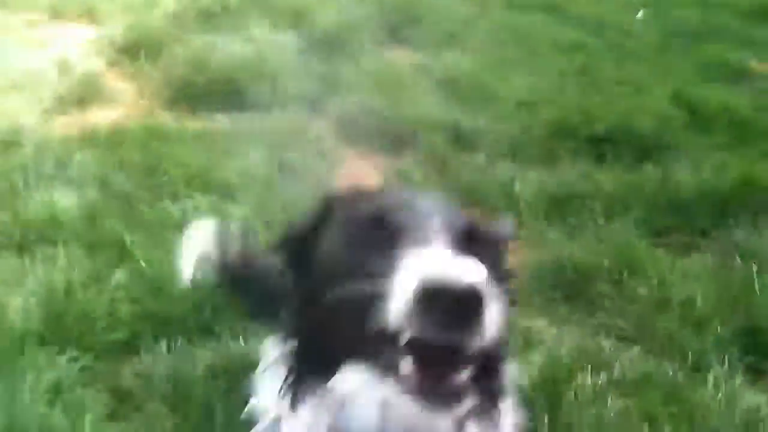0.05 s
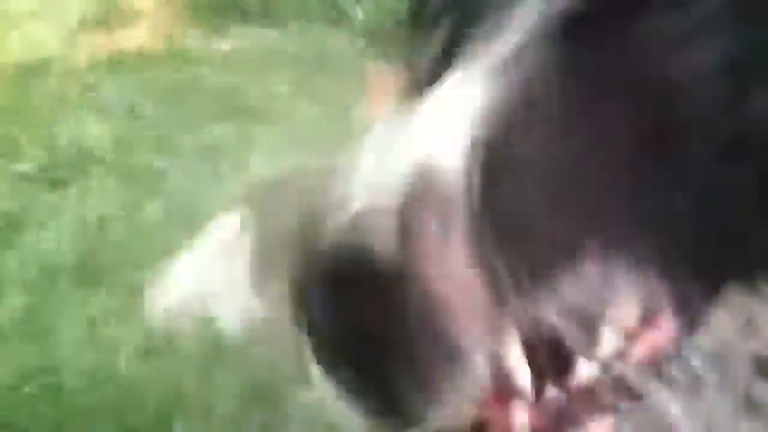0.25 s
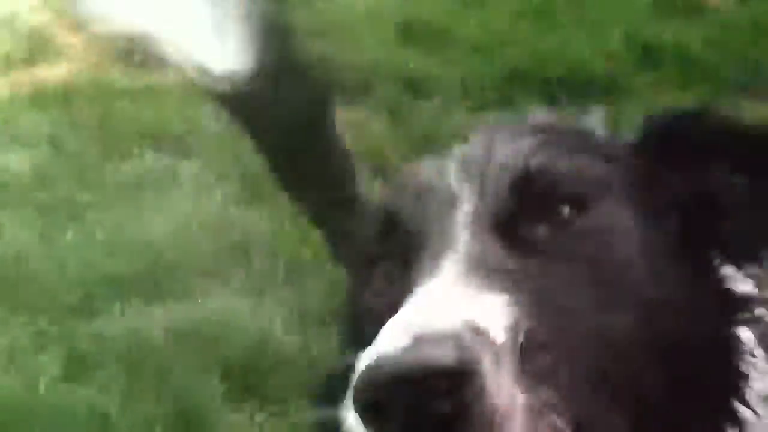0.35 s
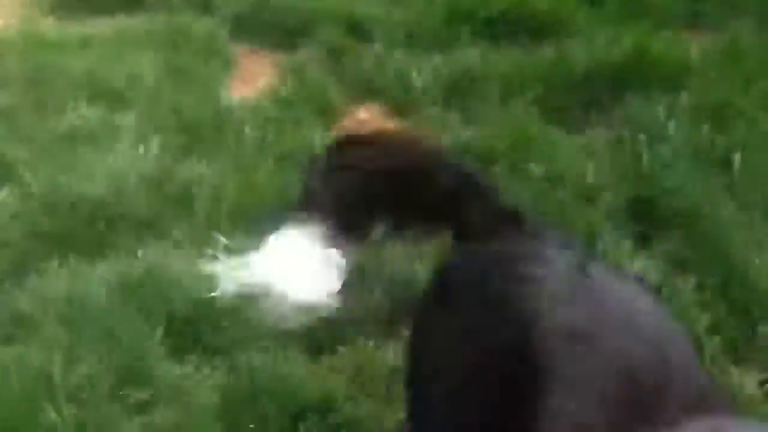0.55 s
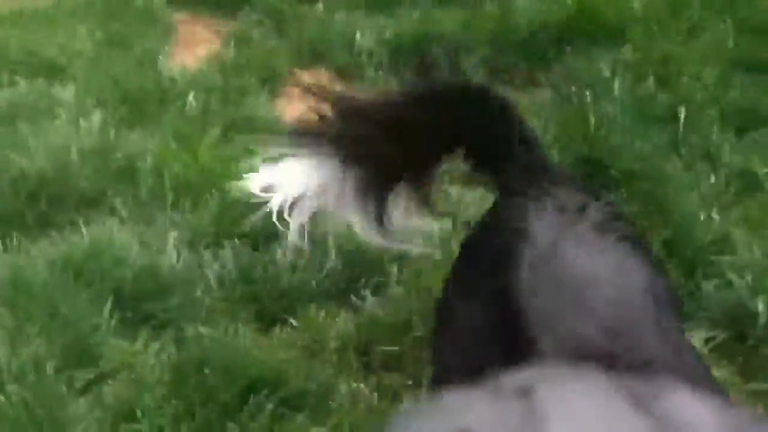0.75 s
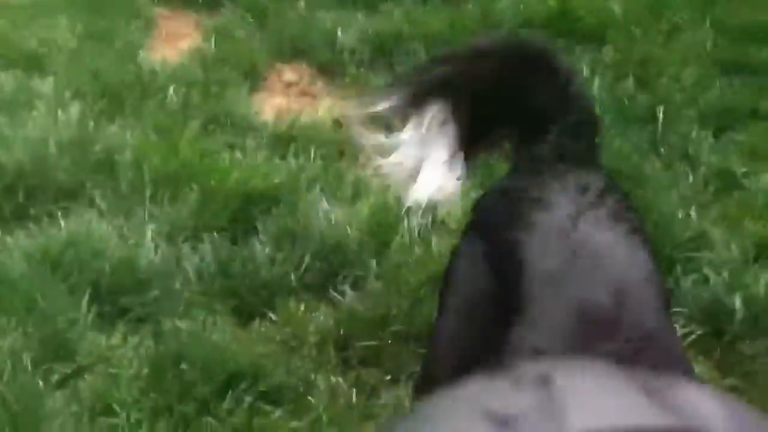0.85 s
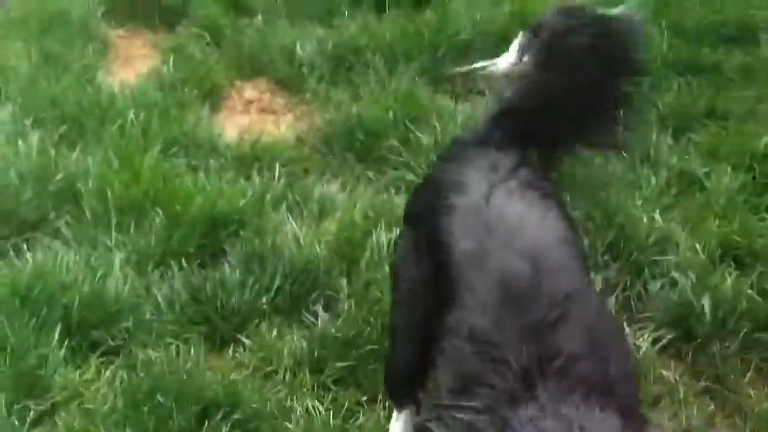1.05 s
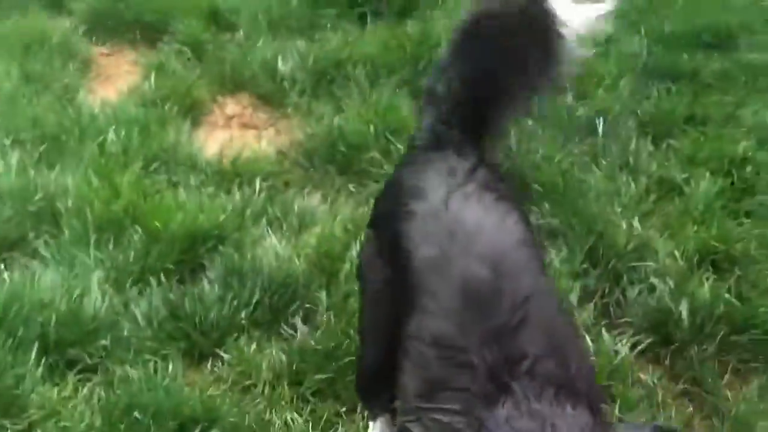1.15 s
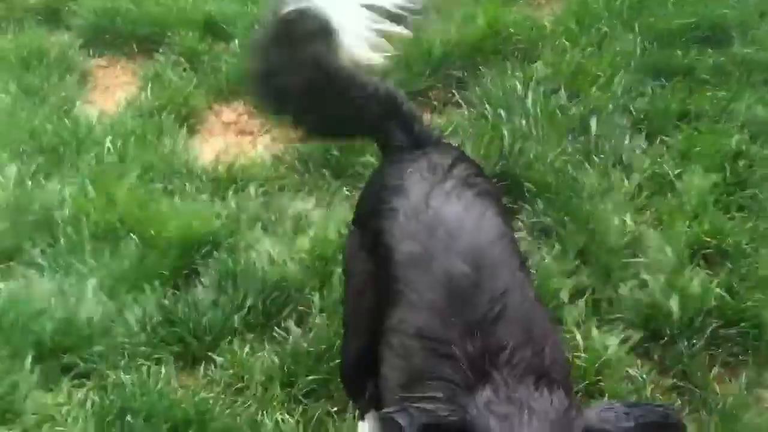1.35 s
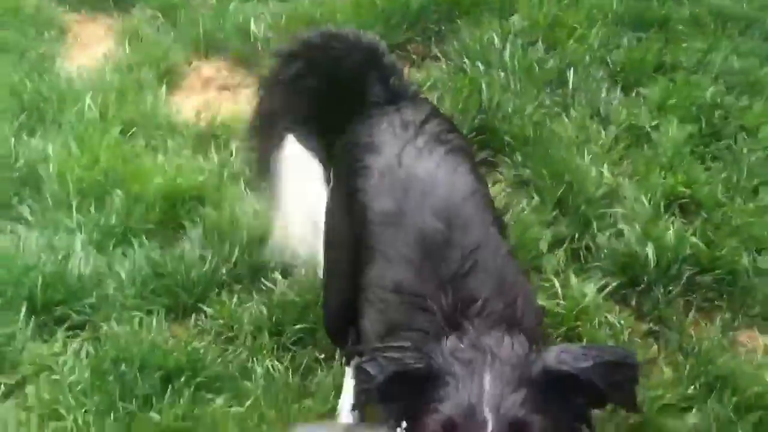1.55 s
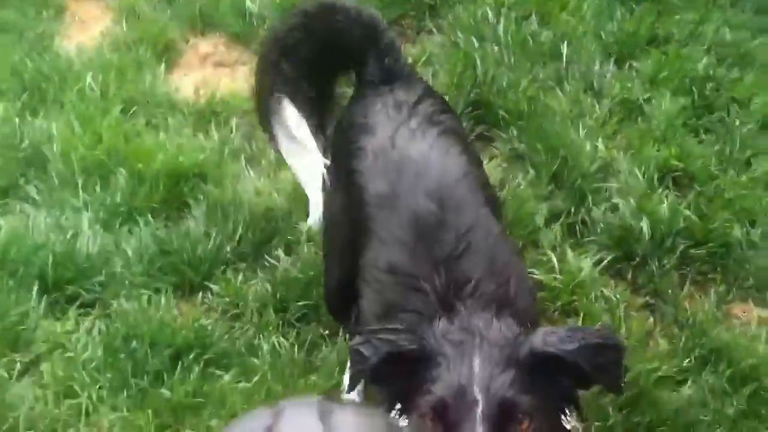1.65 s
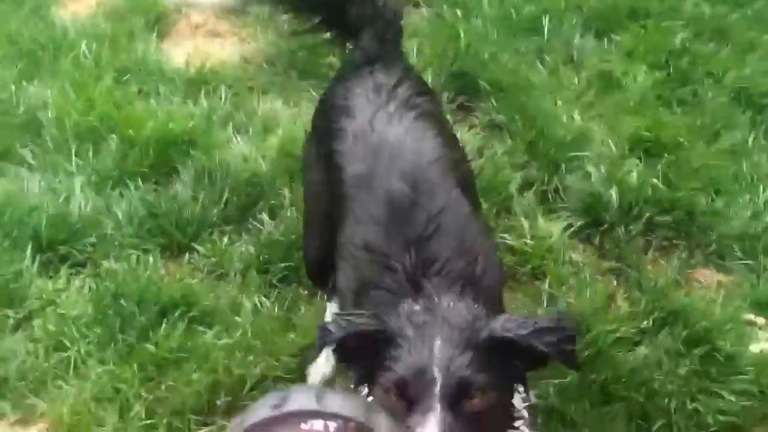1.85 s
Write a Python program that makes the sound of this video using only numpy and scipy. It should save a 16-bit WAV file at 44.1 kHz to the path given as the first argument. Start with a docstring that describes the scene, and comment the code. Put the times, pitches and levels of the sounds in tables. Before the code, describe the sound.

Hose water slaps a dog's muzzle close by, swelling at 0.2 seconds into a bright spatter that rings hollow in its mouth and stops with a knock near 0.35. Two dull knocks and quick ticks follow around 0.5 to 0.6, with collar tags jingling lightly from 0.4 to 0.9. Soft paw steps in wet grass and stray drips fade by 1.7 seconds, over a faint distant motor hum.

```python
"""Water spatters on a dog's muzzle and rings in its open mouth as it bites at a garden hose jet, close by.
The spray is thousands of tiny impacts, with sharp slaps, pops of trapped air and stray drips.
Dull knocks, a quick run of ticks, jingling metal collar tags and paws in wet grass follow the bite.
The yard gives a faint echo, and a distant motor hums under the outdoor air."""
import sys
import numpy as np
from scipy import signal
from scipy.fft import rfft, irfft, next_fast_len
from scipy.io import wavfile
from scipy.ndimage import uniform_filter1d, map_coordinates

SR = 44100
rng = np.random.default_rng(int(sys.argv[2]) if len(sys.argv) > 2 else 0)


def waveform_to_disk(signal):
    """Save audio, clipped to [-1, 1], as 16-bit WAV at the path in sys.argv[1]."""
    frames = np.transpose(np.atleast_2d(signal))
    scaled = np.clip(frames, -1, 1) * 32767
    samples = np.round(scaled).astype(np.int16)
    wavfile.write(sys.argv[1], SR, samples)


N = 83790


def amp(db):
    """Decibels to gain."""
    return 10 ** (np.asarray(db) / 20)


def unit(x):
    """Scale to rms 1."""
    return x / np.sqrt(np.mean(x ** 2) + 1e-20)


def fader(points):
    """Gain per sample from (t/s, level/dB) points."""
    return amp(np.interp(np.arange(N) / SR, *np.transpose(points)))


def filtered(x, response):
    """Filter x by a gain that is a function of frequency."""
    size = next_fast_len(N + SR // 2)
    return irfft(rfft(x, size) * response(np.fft.rfftfreq(size, 1 / SR)), size)[:N]


def coloured(x, eq):
    """Shape x by (f/Hz, level/dB) points, then scale to rms 1."""
    f, db = np.transpose(eq)
    return unit(filtered(x, lambda hz: amp(np.interp(np.log(hz + 1), np.log(f + 1), db))))


def wobble(per_s):
    """A smooth curve through per_s random values a second."""
    return map_coordinates(rng.standard_normal(256), [np.arange(N) * per_s / SR], mode="wrap")


def grains(per_s, spread_db, hiss_share):
    """Tiny random impacts of uneven size over a fine hiss, even in overall strength."""
    hits = (rng.random(N) < per_s / SR) * rng.choice([-1, 1], N)
    hits = hits * amp(spread_db * np.minimum(rng.exponential(size=N), 4))
    hits /= np.sqrt(np.abs(uniform_filter1d(hits ** 2, size=800)) + 1e-6)
    return np.sqrt(1 - hiss_share) * hits + np.sqrt(hiss_share) * rng.standard_normal(N)


def fade(t, t60):
    """Exponential decay, 60 dB down at t60."""
    return np.exp(-np.log(1000) * t / t60)


def add(track, s, sound):
    """Mix a sound in at s seconds."""
    part = track[max(round(s * SR), 0):][:len(sound)]
    part += sound[:len(part)]


# Fader ride of the spray on the muzzle: t/s, level/dB
SPRAY_RIDE = [(0, -36), (.008, -43), (.03, -51), (.056, -48), (.09, -61), (.165, -69), (.19, -48),
              (.205, -37), (.213, -24.5), (.256, -20.5), (.262, -29), (.274, -27), (.283, -21.5), (.3, -23),
              (.336, -23), (.347, -56), (.395, -57.5), (.6, -58), (.8, -64.5), (1.0, -70), (1.2, -78)]
# Bright, wet EQ of the spray: f/Hz, level/dB
SPRAY_EQ = [(59, -59.5), (100, -16), (254, -10.5), (288, -13.5), (413, -11.5), (469, -17.5), (568, -9),
            (673, -18.5), (732, -9.5), (1170, -8), (1270, -7), (1410, -23.5), (1640, 2.5), (1940, -17),
            (2300, 0.5), (3230, -10.5), (3820, -1.5), (5720, 1.5), (6350, 2), (7060, 2), (9300, -3),
            (10800, -2), (15800, -15.5)]
# Bigger slugs of water punch up the spray: t/s, boost/dB
SURGES = [(0.2153, 7), (0.2308, 2.5), (0.2469, 9), (.2552, 0.5), (0.2865, 5), (0.2946, 4.5), (0.3363, 7.5)]
# Fader ride of the water inside the mouth: t/s, level/dB
MOUTH_RIDE = [(0, -53.5), (.03, -63), (.048, -61), (.062, -70), (.19, -80), (.22, -32.5), (.27, -34.5),
              (.3, -31), (.315, -19.5), (.336, -26), (.347, -44.5), (.37, -52), (.4, -57), (.5, -79.5)]
# Hollow resonances of the open mouth: f/Hz, width/Hz, level/dB
MOUTH_MODES = [(1300, 76, 5), (1780, 80, -3), (2210, 280, -2.5), (2750, 350, 0), (3535, 660, -1.5),
               (4935, 450, -8.5)]

def jet():
    """Droplets spatter on the muzzle in surges; those that enter the mouth excite its resonances."""
    def mouth(f):
        return sum((-1) ** k * amp(db) * 1j * f * width / (hz * hz - f * f + 1j * f * width)
                   for k, (hz, width, db) in enumerate(MOUTH_MODES))

    t, surge_s = np.arange(N) / SR, .0014
    surge = amp(sum(db * np.exp(-((t - s) / surge_s) ** 2) for s, db in SURGES))
    spray = coloured(grains(per_s=7500, spread_db=2.6, hiss_share=.38), SPRAY_EQ)
    hollow = unit(filtered(rng.standard_normal(N), mouth))
    return surge * fader(SPRAY_RIDE) * spray + fader(MOUTH_RIDE) * hollow


# Sharp slaps of water ahead of the main burst: t/s, level/dB, t60/s
SLAPS = [(.110, -45, .018), (.175, -25.5, 0.037), (.2025, -40, 0.01584)]
# Slap EQ, a low-mid body and a bright edge: f/Hz, level/dB
SLAP_EQ = [(100, -33), (250, -8), (550, 3.5), (1100, -8), (1700, -12), (2400, -2), (4200, 1), (6300, 4.5),
           (8200, 3), (11500, -16), (15800, -32.5)]
# Stray droplets after the burst: t/s, level/dB
DRIPS = [(1.038, -52.5), (1.213, -58), (1.255, -57.5), (1.263, -62), (1.312, -57.5), (1.370, -49),
         (1.450, -58), (1.512, -59.5), (1.526, -59.5)]
# Thin, glassy drip EQ: f/Hz, level/dB
DRIP_EQ = [(1000, -37), (6000, -2.5), (11000, -2.5), (14500, .5)]

def splashes():
    """Single slugs and drops of water land with a click, then scatter."""
    def land(cues, eq, click_db):
        envelope, clicks, t = np.zeros(N), np.zeros(N), np.arange(SR // 5) / SR
        for s, db, t60 in cues:
            add(envelope, s, amp(db) * fade(t, t60))
            add(clicks, s, amp([db + click_db]))
        impacts = clicks + envelope * grains(per_s=6500, spread_db=1, hiss_share=.15)
        return np.std(impacts) * coloured(impacts, eq)

    drips = [(s, db, .01) for s, db in DRIPS]  # each with a t60 of 10 ms
    return land(SLAPS, SLAP_EQ, click_db=18.5) + land(drips, DRIP_EQ, click_db=7)


# Wet pops of air pockets: t/s, f/Hz, level/dB, t60/s
POPS = [(0.331, 1315, -22, 0.022), (.5215, 755, -27, 0.035), (0.583, 352, -34, 0.032),
        (.734, 3670, -36, 0.011), (1.087, 453, -50.5, 0.13), (1.104, 458, -49, 0.086),
        (1.119, 4030, -39, 0.0097), (1.138, 2120, -39, .01), (1.166, 2270, -44, 0.0098)]

def pops(attack_s=.0018, rise_per_s=.68):
    """Trapped air rings briefly, rising a little in pitch."""
    out, t = np.zeros(N), np.arange(SR // 8) / SR
    attack = 1 - np.exp(-t / attack_s)
    for s, hz, db, t60 in POPS:
        chirp = np.sin(2 * np.pi * hz * t * (1 + rise_per_s * t / 2))
        add(out, s, amp(db) * attack * fade(t, t60) * chirp)
    return out


# Dull, close knocks: t/s, level/dB, low-pass f/Hz, base t60/s, pitch ratio
KNOCKS = [(.038, -31, 1500, 0.036, 1.14), (0.048, -32.5, 1290, 0.038, 1.46),
          (0.117, -39.5, 400, 0.027, 0.63), (.1755, -42.5, 1500, 0.09, 1.55),
          (0.329, -16.5, 1860, 0.034, 1.11), (0.332, -42.5, 1180, 0.068, 1.2),
          (0.365, -28.5, 910, 0.034, 1.26), (0.5145, -18, 1944, 0.022, 1.076),
          (0.5711, -15, 540, 0.034, 0.87), (0.777, -41, 696, 0.027, 0.87), (.823, -37, 880, 0.022, 1.04),
          (.9155, -35, 680, 0.021, 0.83), (0.9193, -36, 695, 0.019, 0.97), (1.085, -42, 2030, 0.026, 1.36),
          (1.12, -45.5, 4900, 0.028, 1.54)]
# Body of a knock: base f/Hz, level/dB, t60 ratio
KNOCK_MODES = [(175, -26, 2.1), (250.8, -2, 0.76), (366, -7, 1.07), (494.2, 0.5, 0.61), (662, -0.5, 0.46),
               (894.4, 5.5, 0.3), (1274, -7, .4), (2600, 3.5, 0.17)]

def knocks(attack_s=.00054, crack_db=-4.5, crack_t60_s=.032, low_cut_hz=155):
    """Soft contacts ring a few low, heavily damped modes, with a short crack of noise."""
    out, t = np.zeros(N), np.arange(SR // 5) / SR
    attack = 1 - np.exp(-t / attack_s)
    for s, db, corner_hz, t60, pitch in KNOCKS:
        ring = sum(amp(mode_db) * fade(t, t60 * life) * np.sin(2 * np.pi * hz * pitch * t)
                   for hz, mode_db, life in KNOCK_MODES)
        crack = amp(crack_db) * fade(t, crack_t60_s) * rng.standard_normal(len(t))
        low_pass = signal.butter(1, corner_hz, fs=SR)
        add(out, s, amp(db) * signal.lfilter(*low_pass, (ring + crack) * attack))
    return signal.lfilter(*signal.butter(5, low_cut_hz, "high", fs=SR), out)


# Dry ticks, a quick run and a late double: t/s, level/dB
TICKS = [(.5788, -31), (0.584, -32.5), (.590, -35), (0.5948, -30.5), (.600, -34.5), (0.6058, -36),
         (0.6105, -35), (0.8399, -38), (0.843, -37)]
# Tight, bright ring of a tick: f/Hz, level/dB, t60/s
TICK_MODES = [(4400, 2, 0.0024), (7130, 3, 0.0023), (8360, 5, 0.002), (10400, -3.5, 0.0036)]

def ticks(attack_s=.000049):
    """Very short clicks that all ring the same modes."""
    out, t = np.zeros(N), np.arange(SR // 50) / SR
    attack = 1 - np.exp(-t / attack_s)
    ring = sum((-1) ** k * amp(db) * fade(t, t60) * np.sin(2 * np.pi * hz * t)
               for k, (hz, db, t60) in enumerate(TICK_MODES))
    for s, db in TICKS:
        add(out, s, amp(db) * attack * ring)
    return out


# Collar tags touching: t/s, level/dB, treble tilt/(dB per octave)
CLINKS = [(.431, -41, 0.5), (.445, -57, -10), (.4637, -37, -0.5), (.4875, -45, -4.5), (.619, -53, -2),
          (.695, -74, -1), (.719, -57, -6), (.762, -66, 3), (.776, -50.5, -0.5), (.851, -45.5, 0),
          (0.866, -48, 5)]
# Metallic shimmer of the tags: f/Hz, level/dB, t60/s
TAG_MODES = [(3880, -17, .16), (4470, -7, .1), (9230, -19, .08), (9730, -9, .11), (11680, -3, .075),
             (11910, -5, .1), (13730, -10, .2), (13930, -11, .13)]

def collar_tags(contacts=3, gap_s=.0035, loss_db=5, crack_db=-2.5, crack_t60_s=.017):
    """At every touch the loose metal tags chatter: ever weaker contacts, each ringing them anew."""
    out, t = np.zeros(N), np.arange(SR // 4) / SR
    centre_hz = np.mean([mode[0] for mode in TAG_MODES])
    for s, db, tilt_db in CLINKS:
        for k in range(contacts):
            ring = np.zeros(len(t))
            for hz, mode_db, t60 in TAG_MODES:
                gain = amp(mode_db + tilt_db * np.log2(hz / centre_hz) + rng.normal(0, 1.4))
                detuned_hz = hz * (1 + rng.normal(0, .0047))
                ring += gain * fade(t, t60) * np.sin(2 * np.pi * (detuned_hz * t + rng.random()))
            crack = amp(crack_db) * fade(t, crack_t60_s) * rng.standard_normal(len(t))
            delay_s = k * gap_s * np.exp(rng.normal(0, .2))
            add(out, s + delay_s, amp(db - k * loss_db) * (ring + crack))
    return out * (1 + .36 * wobble(per_s=401))  # the tags rub, which roughens the ring


# Paw steps: t/s, level/dB, length/s
STEPS = [(.716, -46.5, 0.014), (0.74, -58, .02), (0.778, -53.5, 0.0255), (0.819, -54.5, 0.03),
         (.923, -52, 0.0065), (0.963, -56.5, 0.012), (1.078, -59.5, .01), (1.107, -48, 0.0071),
         (1.123, -49, .012), (1.137, -60.5, 0.028), (1.329, -60.5, 0.0087), (1.646, -56, 0.012)]
# Squashy EQ of wet grass: f/Hz, level/dB
GRASS_EQ = [(60, -26), (170, 7), (500, 11.5), (1200, 1), (4000, -2.5), (8000, -1.5), (12000, -32.5),
            (16000, -30)]
# Fader ride of the movement rumble: t/s, level/dB
SHUFFLE_RIDE = [(0, -40), (.09, -71), (.2, -52), (.33, -43.5), (.4, -60.5), (.55, -66), (.68, -59),
                (.76, -66.5), (.79, -57.5), (.84, -63), (.89, -63), (.93, -64), (.97, -62), (1.1, -71)]
# Dark EQ of that rumble: f/Hz, level/dB
SHUFFLE_EQ = [(25, -13.5), (70, -21.5), (110, -14.5), (175, -2.5), (350, -18), (900, -11.5), (2500, -28.5)]

def paws():
    """Each step is a short swell of crackling wet grass, over the rumble of the moving dog and camera."""
    t = np.arange(N) / SR
    swells = sum(amp(db) * np.exp(-2 * np.abs(t - s) / length) for s, db, length in STEPS)
    crackle = coloured(grains(per_s=3700, spread_db=4, hiss_share=.33), GRASS_EQ)
    rumble = coloured(rng.standard_normal(N), SHUFFLE_EQ)
    return swells * crackle + fader(SHUFFLE_RIDE) * rumble


def yard_echo(close, level_db=-22, t60_s=.3):
    """The yard throws back a faint, short, diffuse tail."""
    t = np.arange(SR // 2) / SR
    tail = rng.standard_normal(len(t)) * fade(t, t60_s)
    return amp(level_db) * signal.fftconvolve(close, tail / np.linalg.norm(tail))[:N]


# Drone of the far motor: f/Hz, level/dB
MOTOR_TONES = [(153.3, -67), (465, -79.5), (368.6, -83), (220, -76.5)]
# Soft, bass-heavy EQ of the air bed: f/Hz, level/dB
AIR_EQ = [(15, -67), (25, -46), (76, -32), (96, -9.5), (148, -1.5), (174, -19), (205, -8), (261, -11.5),
          (361, -9), (392, -20.5), (437, -16.5), (637, -17.5), (955, -18.5), (1060, -20), (1360, -19),
          (1820, -22), (3880, -28), (4820, -32.5), (11400, -43.5), (13100, -42), (15800, -50.5)]

def outdoors(air_db=-63):
    """The slightly wavering hum of a far motor in steady air."""
    hum, t = np.zeros(N), np.arange(N) / SR
    for hz, db in MOTOR_TONES:
        rms = amp(db + 2.5 * wobble(per_s=6.7))
        hum += rms * np.sqrt(2) * np.sin(2 * np.pi * hz * t + .4 * wobble(per_s=18))
    return hum + amp(air_db) * coloured(rng.standard_normal(N), AIR_EQ)


def scene():
    """The close sounds, their echo from the yard and the background, in mono."""
    water = jet() + splashes() + pops()
    close = water + knocks() + ticks() + collar_tags() + paws()
    return (close + yard_echo(close) + outdoors())[None]


# Top-end roll-off of the microphone: f/Hz, level/dB
MIC_EQ = [(13000, -0.5), (14300, -5.5), (15200, -8), (16000, -20.5)]
TOP_HZ = 16000

def record(dry):
    """The microphone dulls the top treble and passes nothing above its band limit."""
    return filtered(dry[0], lambda hz: amp(np.interp(hz, *np.transpose(MIC_EQ))) * (hz < TOP_HZ))[None]


dry = scene()
out = record(dry)
waveform_to_disk(out)
```